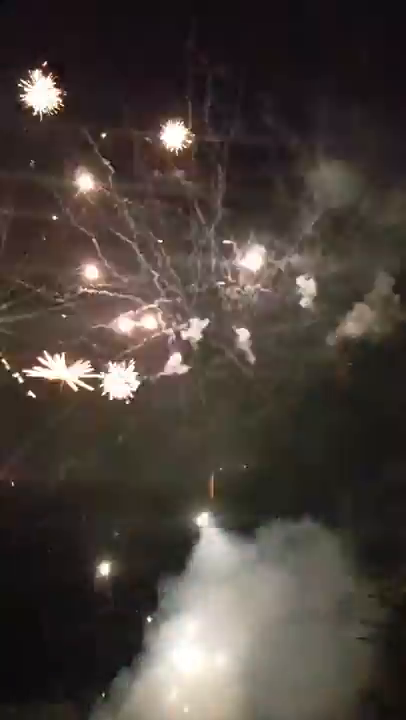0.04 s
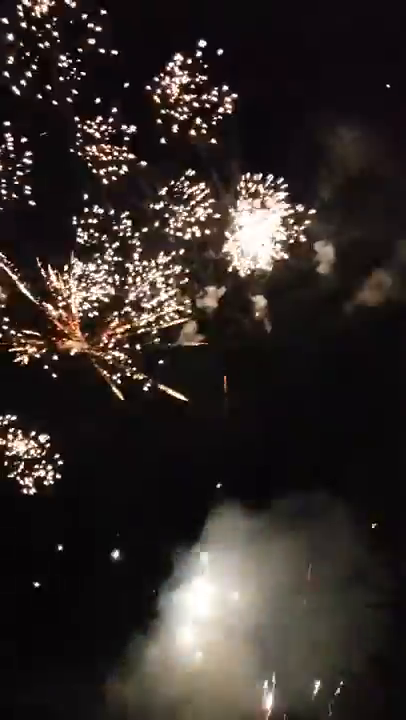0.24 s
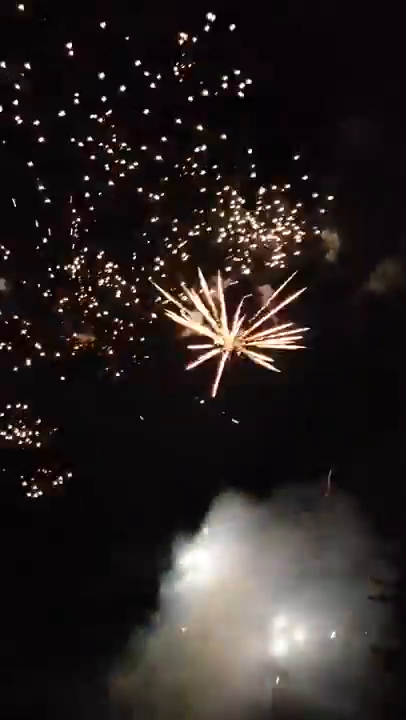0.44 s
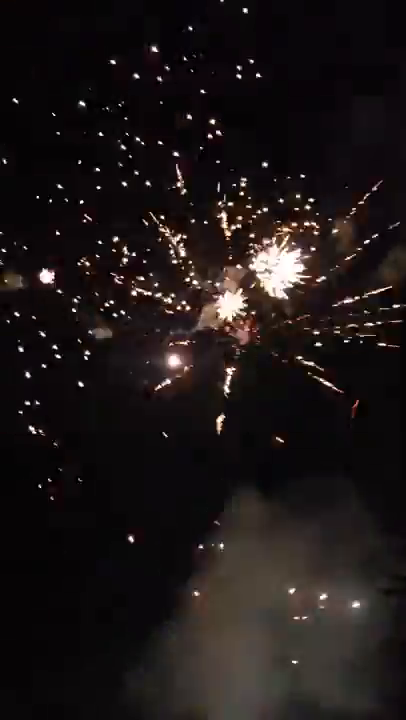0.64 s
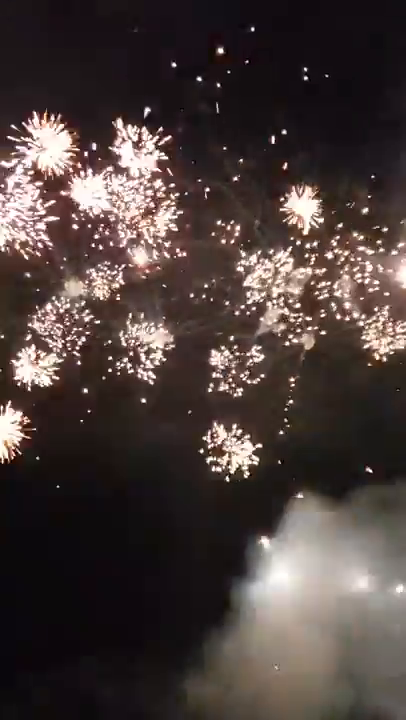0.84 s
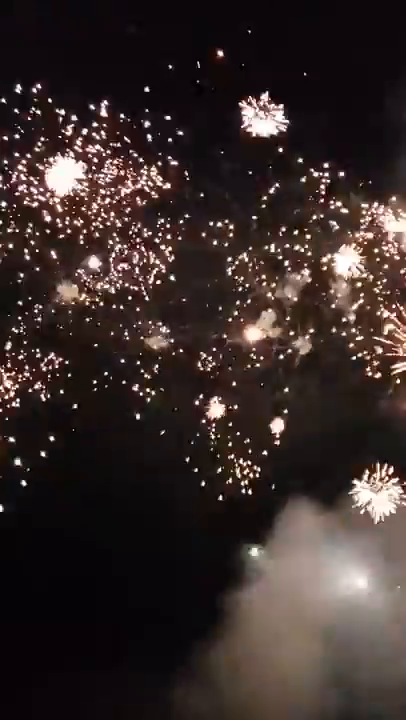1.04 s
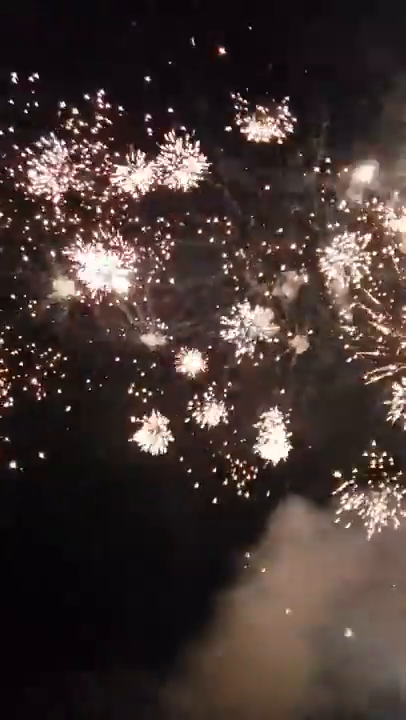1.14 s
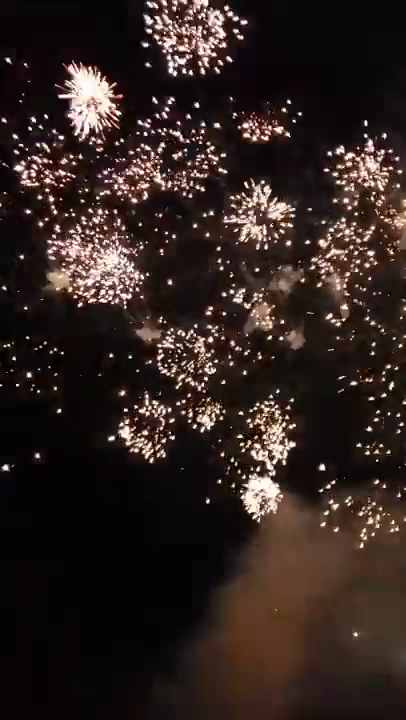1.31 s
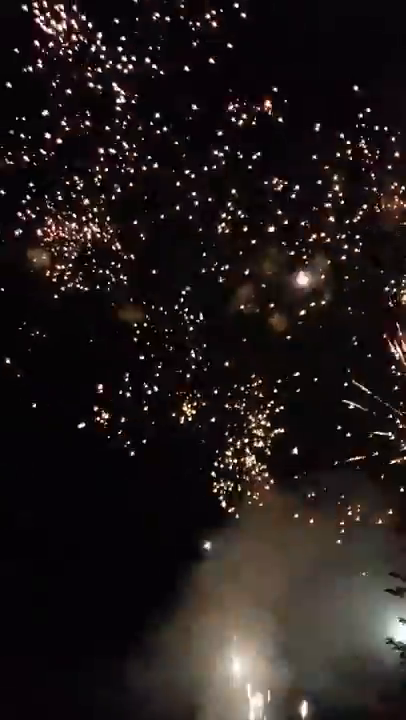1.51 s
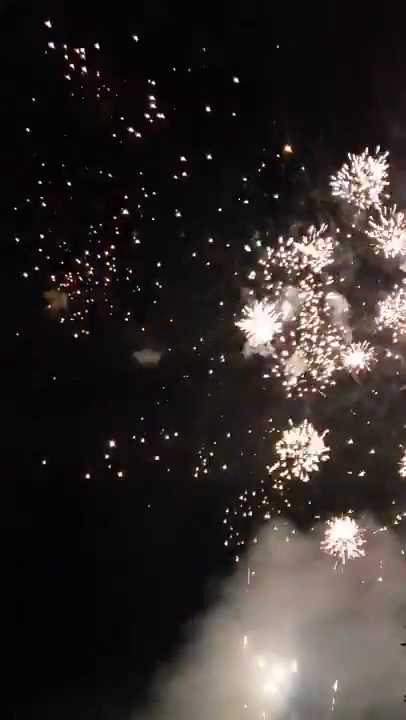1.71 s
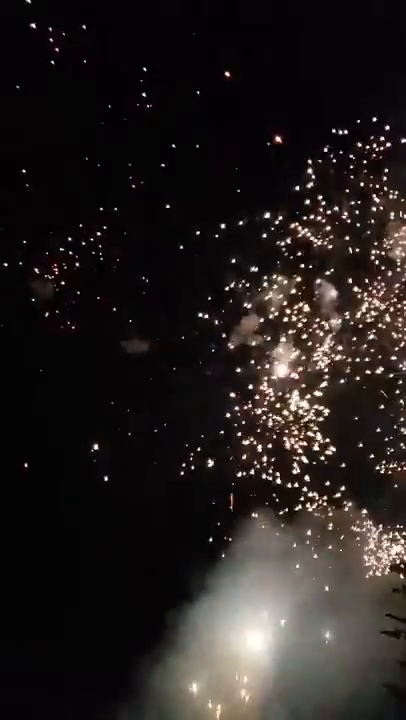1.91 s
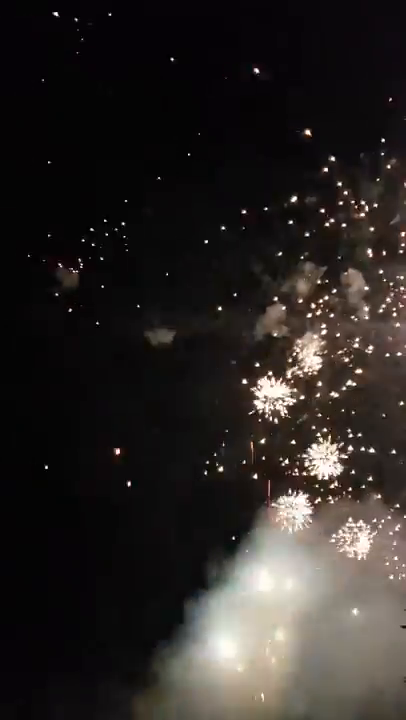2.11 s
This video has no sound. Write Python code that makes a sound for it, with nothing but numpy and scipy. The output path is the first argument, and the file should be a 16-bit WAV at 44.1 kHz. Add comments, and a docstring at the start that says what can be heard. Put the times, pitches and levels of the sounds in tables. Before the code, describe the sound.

Fireworks burst close overhead outdoors at night: four hard bangs spaced through two seconds, crackling stars between them, low mortar thumps from the ground, long rolling echoes, loud and slightly squashed at the microphone.

```python
"""Fireworks overhead

Four shells burst with sharp bangs, stars crackle alone and in swarms, and mortars thump on the ground.
Each bang, crack and thump is a short shock with its own colour. Bangs and cracks reach left and right
directly, off nearby surfaces and off the ground. All of them ring on in the surroundings as fading
noise, with stronger far echoes of the bursts on top. Steady coloured noise makes a distant rumble."""
import sys
import numpy as np
from scipy import signal
from scipy.fft import rfft, irfft, next_fast_len
from scipy.io import wavfile

SR = 44100
rng = np.random.default_rng(int(sys.argv[2]) if len(sys.argv) > 2 else 0)


def to_wav(sig):
    """Store sig (one row per channel, or 1-D mono) as 16-bit WAV at the path in sys.argv[1].

    Samples outside -1..1 are clipped; the rate is SR.
    """
    pcm = np.clip(np.atleast_2d(sig), -1, 1) * 32767
    pcm = np.round(pcm).astype(np.int16)
    wavfile.write(sys.argv[1], SR, pcm.T)  # frames by channels


N = 94815

LEAD = SR // 2  # samples computed ahead of the scene, so earlier echoes can ring into it
SIZE = 2 ** 13  # samples in one short response
FREQ = np.fft.rfftfreq(SIZE, 1 / SR)  # Hz
AGE = np.arange(SIZE) / SR  # s
RIGHT_ONLY = np.array([[0], [1]])
# where the bass gives way, and where body gives way to treble
BASS_HZ, TREBLE_HZ = 170, 1430


def undb(db):
    """Turn decibels into a gain."""
    return 10 ** (np.asarray(db) / 20)


def along(points, hz):
    """Read a table at any frequency, on a logarithmic frequency axis."""
    f, v = np.array(points, float).T
    return np.interp(np.log(hz + 1), np.log(f), v)


def unit(x):
    """Scale to an energy of one, averaged over the channels."""
    energy = np.sum(x ** 2, axis=-1)
    return x / np.sqrt(np.mean(energy))


def shock(points):
    """Spectrum of a pressure pulse of unit energy and given colour, with its energy packed up front."""
    cepstrum = irfft(np.log(undb(along(points, FREQ))))
    # folding the cepstrum forward gives the pulse its sharp front (minimum phase)
    cepstrum[1:SIZE // 2] *= 2
    cepstrum[SIZE // 2 + 1:] = 0
    pulse = irfft(np.exp(rfft(cepstrum)))
    return rfft(unit(pulse))


def late(ms):
    """Spectrum of a delay, rounded to whole samples."""
    samples = round(abs(ms) * SR / 1000)
    return np.exp(-2j * np.pi * FREQ * samples / SR)


def strikes(times, db):
    """A train of single-sample clicks that starts a little before the scene."""
    train = np.zeros(LEAD + N)
    places = np.round(np.asarray(times) * SR).astype(int) + LEAD
    np.add.at(train, np.clip(places, 0, LEAD + N - 1), undb(db))
    return train


def table_strikes(table):
    """A train of clicks from a table of times and levels."""
    times, db = np.array(table).T
    return strikes(times, db)


def ring(train, response):
    """Play a response at every click of a train (convolution)."""
    return signal.fftconvolve(np.atleast_2d(train), np.atleast_2d(response), axes=-1)[:, :LEAD + N]


# How alike left and right are in sound from all around: (frequency [Hz], likeness [0-1])
LIKENESS = [(60, 0.93), (290, 0.94), (640, 0.7), (1300, 0), (16000, 0.22)]


def diffuse(size):
    """Spectrum of noise from all around, and its frequencies; the bass is alike on both sides."""
    hz = np.fft.rfftfreq(size, 1 / SR)
    mid, side = rfft(rng.standard_normal((2, size)))
    like = np.clip(along(LIKENESS, hz), -.9, .99)
    opposite = np.array([[1], [-1]])
    return mid * np.sqrt(1 + like) + side * np.sqrt(1 - like) * opposite, hz


def scatter(decay_s):
    """Spectrum of a short spray of small reflections: noise that swells and fades."""
    noise = irfft(diffuse(SIZE)[0])
    return rfft(unit(noise * np.sqrt(AGE) * np.exp(-AGE / decay_s)))


SCATTER_S = 0.0039  # fading time of the spray around bursts and cracks
GROUND_SPREAD_MS, GROUND_DULL_HZ = 0.49, 3250


def paths(ground_ms, ground_db, right_ms):
    """The direct sound and its duller bounce off the ground, which reaches the right side first."""
    direct = np.array([late(0), late(right_ms)])
    bounce_left = late(ground_ms + GROUND_SPREAD_MS / 2)
    bounce_right = late(ground_ms - GROUND_SPREAD_MS / 2)
    dulling = 1 + 1j * FREQ / GROUND_DULL_HZ
    return direct + undb(ground_db) * np.array([bounce_left, bounce_right]) / dulling


# Surfaces close to the microphones: (left delay [ms], right delay [ms], level [dB])
NEAR = [(1.35, 1.233, -10.5), (2.3, 1.8, -10), (3.3, 2.85, -13.5)]


def near_surfaces():
    """Delayed copies of a sound, thrown back by nearby surfaces."""
    return sum(undb(db) * np.array([late(left), late(right)]) for left, right, db in NEAR)


# How long the surroundings ring: (frequency [Hz], time to fade by 60 dB [s])
FADE_TIMES = [(100, 2.14), (600, 1.7), (1500, 1.35), (4000, 1.14), (8000, 1.0), (15000, 0.84)]
ECHO_BUILD_S, ECHO_PATCHY_DB, PATCH_S = 0.0028, 2, .006


def surroundings():
    """Dense, uneven echoes from trees and buildings: noise in bands, whose treble dies first."""
    noise, hz = diffuse(2 * SR)
    age = np.arange(2 * SR) / SR
    echoes = 0
    for k, (_, fade_s) in enumerate(FADE_TIMES):
        band = along([(f, float(j == k)) for j, (f, _) in enumerate(FADE_TIMES)], hz)
        echoes = echoes + irfft(noise * band) * np.exp(-np.log(1000) * age / fade_s)
    patches = np.interp(age / PATCH_S, np.arange(4096), rng.standard_normal(4096))
    build = 1 - np.exp(-age / ECHO_BUILD_S)
    return unit(echoes * undb(ECHO_PATCHY_DB * patches) * build)


# Colour of the rumble: (frequency [Hz], relative level [dB])
RUMBLE = [(25, -30), (60, -27), (130, -9.5), (300, -7), (650, 2.5), (1300, -24), (2500, 4.5), (4500, -13),
          (6500, -20), (16000, -40)]
RUMBLE_DB = -47


def rumble():
    """The merged echoes of older bursts, made as steady coloured noise."""
    noise, hz = diffuse(next_fast_len(N, True) * 2)
    x = irfft(noise * undb(along(RUMBLE, hz)))[:, :N]
    return undb(RUMBLE_DB) * x / x.std()


# Strong echoes of the bursts from far objects: (time [s], relative level [dB])
SLAPS = [(.222, -5), (.556, -5), (.574, -2), (1.14, -5.5), (1.56, -1.5), (1.566, -6.5)]
# Late echoes of the bursts from far slopes: (time [s], relative level [dB])
ROLLS = [(.61, -6), (.665, -3), (.76, -0.5), (1.19, -3), (1.60, -6), (1.68, 0.5), (1.82, -4.5), (1.99, -6)]
# Colour of both kinds of echo: (frequency [Hz], relative level [dB])
ROLL_COLOUR = [(60, -30), (250, -10), (420, 1), (700, 3), (1000, 0), (1500, -14), (4000, -24), (12000, -50)]
SLAP_DB, SLAP_S = 1.5, 0.0062
ROLL_DB, ROLL_S = -4, 0.023


def far_echoes():
    """Far objects and slopes return each shock as a spray of reflections; slopes smear it longer."""
    slap = irfft(shock(ROLL_COLOUR) * scatter(SLAP_S))
    roll = irfft(shock(ROLL_COLOUR) * scatter(ROLL_S))
    slaps = undb(SLAP_DB) * ring(table_strikes(SLAPS), slap)
    rolls = undb(ROLL_DB) * ring(table_strikes(ROLLS), roll)
    return slaps + rolls


# Mortar launches: (time [s], relative level [dB])
THUMPS = [(.008, -14), (.56, -2), (.575, -15.5), (1.328, -0.5), (1.586, -1)]
# Colour of a thump: (frequency [Hz], relative level [dB])
THUMP_COLOUR = [(30, -51), (80, -13), (150, 0.5), (280, 5.5), (450, -2.5), (1000, -36), (8000, -74)]
THUMP_DB, THUMP_ECHO_DB = -5.5, -10.5  # the echo level is relative to the thump


def mortars(far):
    """Dull launch thumps from the ground: low-pitched shocks and their echoes."""
    thumps = undb(THUMP_DB) * ring(table_strikes(THUMPS), irfft(shock(THUMP_COLOUR)))
    return thumps + undb(THUMP_ECHO_DB) * ring(thumps, far)


# Single loud cracks of stars: (time [s], relative level [dB])
CRACKS = [(0.108, -14), (0.1385, -3.5), (0.3264, -7), (0.3672, -5.5), (0.5601, -7), (0.7683, -8),
          (0.842, -6.5), (0.8777, -4.5), (0.884, -11.5), (0.8937, -3), (0.9216, -5.5), (0.9448, -12),
          (0.953, -16), (0.9642, -7), (0.9778, -4.8), (0.9908, -16), (0.9974, -3), (1.0415, -16),
          (1.0497, -8.5), (1.0701, -8), (1.1943, -10.5), (1.2528, -4), (1.2728, -1.5), (1.2893, -5.5),
          (1.3134, -5), (1.3211, -8.1), (1.3262, -2), (1.3616, -5.5), (1.3887, -6), (1.3996, -6),
          (1.4336, -13), (1.585, -6), (1.7326, -7), (1.7588, -0.5), (1.786, -13), (1.7914, -10.7),
          (1.837, -7), (1.8537, -11.5), (1.8672, -5.5), (1.9886, -6.5), (2.1493, -12.5)]
# Swarms of crackling stars: (start [s], length [s], relative level [dB])
SWARMS = [(0, 0.19, -21), (0.221, .1, -12), (.885, .125, -9.5), (1.266, .035, -16.5), (1.32, .02, -9.5),
          (1.761, .085, -13), (1.851, .06, -5.5), (1.92, 0.25, -22.5)]
# Colour of a crack: (frequency [Hz], relative level [dB])
CRACK_COLOUR = [(60, -34), (300, -12), (600, -1), (1400, -2), (2300, 1.5), (4700, 1.5), (6200, -11),
                (8000, -15), (8900, -23.5), (10500, -15.5), (15500, -14)]
CRACK_GAIN_DB, CRACK_TILT_DB = -1, 7
SWARM_DB, SWARM_COUNT, SWARM_SPREAD_DB = -4, 14, 6.5  # SWARM_COUNT cracks in each swarm
CRACK_GROUND_MS, CRACK_GROUND_DB, CRACK_RIGHT_MS = 6.4, -7, .12
CRACK_NEAR_MS, CRACK_NEAR_DB = 2.05, -0.5  # a surface beside the right microphone
CRACK_SPRAY_DB, CRACK_TAIL_DB = -6.5, -6.5


def stars(far):
    """Tiny shocks, alone and in random swarms; the single ones vary in body against treble."""
    times, db = np.array(CRACKS).T
    db = db + CRACK_GAIN_DB
    tilt = CRACK_TILT_DB * rng.standard_normal(len(db))
    fronts = strikes(times, db - tilt / 2)
    bodies = strikes(times, db + tilt)
    for start, length, swarm_db in SWARMS:
        # one crack at a random place in each equal slice of the swarm
        place = rng.random(size=SWARM_COUNT)
        loud = 2 * rng.random(size=SWARM_COUNT) - 1
        moments = start + length * (np.arange(SWARM_COUNT) + place) / SWARM_COUNT
        swarm = strikes(moments, SWARM_DB + swarm_db + SWARM_SPREAD_DB * loud)
        fronts, bodies = fronts + swarm, bodies + swarm
    crack = shock(CRACK_COLOUR)
    low = 1 / (1 + 1j * FREQ / TREBLE_HZ)
    pops = ring(bodies, irfft(crack * low)) + ring(fronts, irfft(crack * (1 - low)))
    beside = undb(CRACK_NEAR_DB) * late(CRACK_NEAR_MS) * RIGHT_ONLY
    spray = undb(CRACK_SPRAY_DB) * scatter(SCATTER_S)
    way = paths(CRACK_GROUND_MS, CRACK_GROUND_DB, CRACK_RIGHT_MS) + beside + spray
    return ring(pops, irfft(way)) + undb(CRACK_TAIL_DB) * ring(pops, far)


# Colour of a burst before its bass and treble changes: (frequency [Hz], relative level [dB])
BLAST_COLOUR = [(30, -24), (100, -7), (180, -7), (260, -9), (360, 3), (560, 0.5), (1050, -4), (1500, -12),
                (2200, -5), (3000, -16), (4400, -14), (6300, -23.5), (9500, -30), (15000, -18.5)]


def burst_colour(bass_db, treble_db, pitch):
    """Colour of one burst: its table is shifted in pitch, with bass and treble raised or lowered."""
    points = []
    for hz, level in BLAST_COLOUR:
        bass = bass_db / (1 + (hz / BASS_HZ) ** 2)
        treble = treble_db / (1 + (TREBLE_HZ / hz) ** 2)
        points.append((hz * pitch, level + bass + treble))
    return points


# Shell bursts: (time [s], relative level [dB], bass change [dB], treble change [dB],
# pitch [ratio], ground echo delay [ms], ground echo level [dB], right side delay [ms],
# relative level sent to the long echo [dB])
SHELLS = [(.2031, 0.5, 13, 2.5, 0.98, 5.53, 1.5, 0.1, 0), (0.5339, 3.5, -16, -9, 1.08, 5.7, -3, 0.075, 0.5),
          (1.1182, 0, -9, -8, 1.06, 5.7, -2.5, .25, -1.5), (1.519, 1.5, -9, -6, 1.025, 4.87, -4, .03, 0)]
# Colour of the sound sent to the long echo: (frequency [Hz], relative level [dB])
ECHO_COLOUR = [(40, -37), (120, -19.5), (250, -9), (430, 1.5), (900, 2), (1400, -4.5), (2500, -3.5),
               (4700, -4), (6300, -18), (8000, -16.5), (8900, -25.5), (10500, -18), (15500, -19)]
BLAST_DB, BLAST_SCATTER_DB, ECHO_DB = 11, -5, 7
EARLIER_S, EARLIER_DB = -.2, -3  # a shell that burst just before the start and still echoes


def shells(near, far):
    """Each burst is one shock with its close reflections, then its long echo."""
    bursts = 0
    sent = strikes([EARLIER_S], [EARLIER_DB])
    for s, db, bass_db, treble_db, pitch, ground_ms, ground_db, right_ms, echo_db in SHELLS:
        blast = shock(burst_colour(bass_db, treble_db, pitch))
        spray = undb(BLAST_SCATTER_DB) * scatter(SCATTER_S)
        way = paths(ground_ms, ground_db, right_ms) + near + spray
        bursts = bursts + ring(strikes([s], [BLAST_DB + db]), irfft(blast * way))
        sent = sent + strikes([s], [echo_db])
    coloured = ring(sent, irfft(shock(ECHO_COLOUR)))
    return bursts + undb(ECHO_DB) * ring(coloured, far)


def scene():
    """All sources in the same open space."""
    near, far = near_surfaces(), surroundings()
    events = shells(near, far) + far_echoes() + mortars(far) + stars(far)
    right_db = 0.02
    return (events[:, LEAD:] + rumble()) * np.array([[1], [undb(right_db)]])


def record(dry):
    """The recorder flattens the shock peaks smoothly and cuts the highest treble."""
    squashed = dry / (1 + dry ** 4) ** .25
    top_hz = 15900
    low_pass = signal.ellip(7, .1, 60, top_hz, fs=SR, output="sos")
    return signal.sosfiltfilt(low_pass, squashed)


dry = scene()
out = record(dry)
to_wav(out)
```